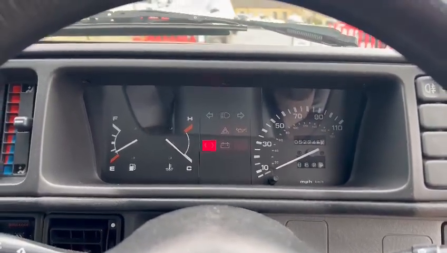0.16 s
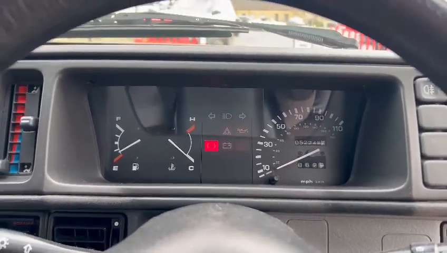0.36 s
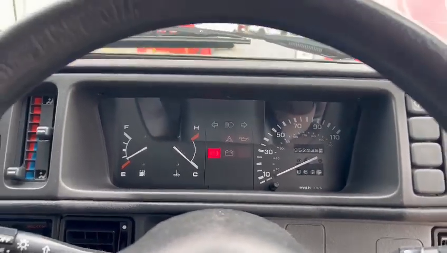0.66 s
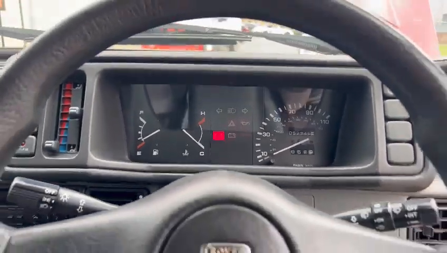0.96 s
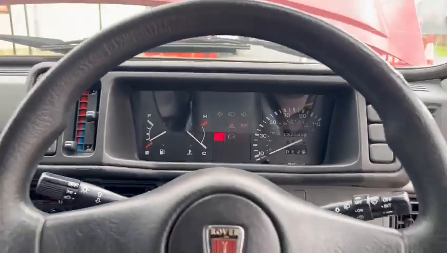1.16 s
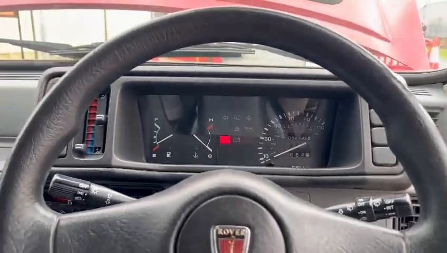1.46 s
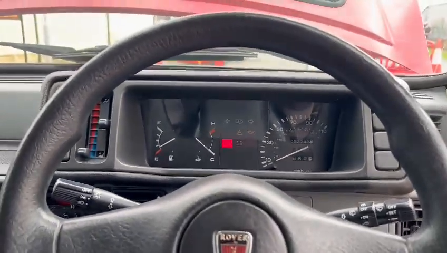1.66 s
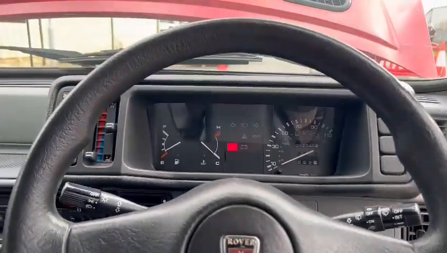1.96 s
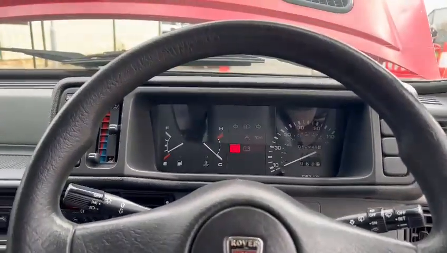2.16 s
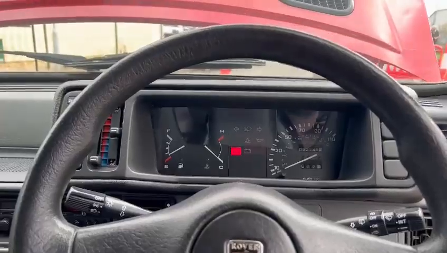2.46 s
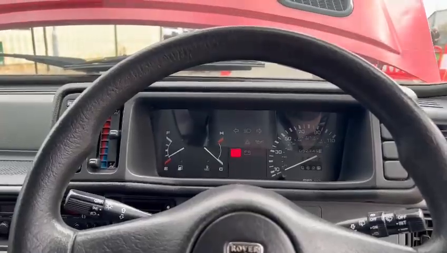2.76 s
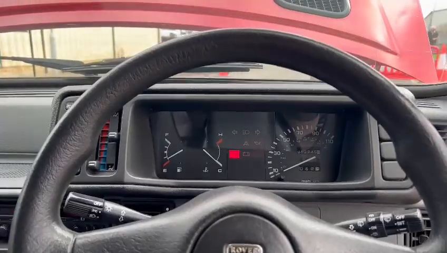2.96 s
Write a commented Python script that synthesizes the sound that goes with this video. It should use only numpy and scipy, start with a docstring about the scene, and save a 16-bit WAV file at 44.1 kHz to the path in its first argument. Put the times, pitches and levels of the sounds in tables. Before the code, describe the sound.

Small petrol engine idling inside a car, then two throttle blips, booming and snarling higher.

```python
"""A small four-cylinder petrol engine, heard from the driver's seat with the bonnet up, idles and is blipped twice.
Sinusoids locked to the firings make the cabin boom and bark; under load, upper orders add a climbing snarl.
Noise and impacts timed by the firings, coloured by filters, make the growl, rasp, clatter and hiss.
A whine follows the speed over a noise rumble; at idle something loose buzzes, then a faint steady whistle takes over."""
import sys
import numpy as np
from scipy import signal
from scipy.fft import rfft, irfft, next_fast_len
from scipy.io import wavfile
from scipy.ndimage import map_coordinates

SR = 44100
rng = np.random.default_rng(int(sys.argv[2]) if len(sys.argv) > 2 else 0)


def dump(signal):
    """Clip the signal to [-1, 1] and save it as 16-bit WAV at the path in sys.argv[1]."""
    limited = np.clip(np.atleast_2d(signal).T, -1, 1)
    pcm = np.round(limited * 32767).astype(np.int16)
    wavfile.write(sys.argv[1], SR, pcm)


N = 136710  # length in samples
HALVES = np.array([[0.5], [-0.5]])  # shares a left-right difference between the channels


def amp(db):
    """Logarithmic level: decibels become an amplitude gain."""
    return 10 ** (np.asarray(db) / 20)


def unit(x):
    """Power normalisation: scale to an rms of 1."""
    return x / np.sqrt(np.mean(x ** 2) + 1e-20)


def along(points, hz):
    """Logarithmic frequency scale: interpolate (Hz, value) points on it."""
    f, value = np.transpose(points)
    return np.interp(np.log(hz + 1), np.log(f + 1), value)


def curve(rows):
    """Envelope: (second, value) rows become one value per sample."""
    return np.interp(np.arange(N) / SR, *np.transpose(rows))


def wobble(rate):
    """Slow random modulation: a smooth curve through random knots, rate of them per second."""
    knots = rng.standard_normal(int(N * rate / SR) + 4)
    return map_coordinates(knots, [np.arange(N) * rate / SR])


def filtered(x, response):
    """Linear filtering: multiply the spectrum by a response of frequency."""
    m = next_fast_len(N + SR // 2)
    return irfft(rfft(x, m) * response(np.fft.rfftfreq(m, 1 / SR)), m)[..., :N]


def colour(points):
    """Frequency response: a gain curve through (Hz, dB) points."""
    return lambda hz: amp(along(points, hz))


# Level of the side signal against the mid. Each row: frequency in Hz, level in dB.
SIDE_LEVEL = [(60, -12.5), (130, -8), (250, -8.5), (500, 2), (1000, -0.5), (2000, 3.5), (4000, 0.5),
              (9000, -1)]
# Left-right level difference. Each row: frequency in Hz, left minus right in dB.
LEFT_RIGHT = [(60, 4.5), (250, -1), (500, 1.5), (1000, -4.5), (2000, -3), (4000, 2.5), (9000, 0)]
CABIN_T60_S = 0.044  # 60 dB decay of the noise that shapes the reflections


def cabin(x, response, t60_s=CABIN_T60_S):
    """Diffuse reflection: decaying noise scatters a coloured source into stereo whose mid has rms 1."""
    t = np.arange(SR // 10) / SR
    walls = rfft(rng.standard_normal((2, len(t))) * amp(-60 * t / t60_s))
    walls = irfft(walls / np.sqrt(np.abs(walls) + 1e-9))  # flattens the spectrum in part
    scattered = signal.fftconvolve(x[None], walls, axes=1)[:, :N]
    mid, side = filtered(scattered, response)
    mid = unit(mid)
    side = filtered(unit(side), colour(SIDE_LEVEL))
    pair = np.array([mid + side, mid - side])
    pair = filtered(pair, lambda hz: amp(along(LEFT_RIGHT, hz) * HALVES))
    return pair / np.sqrt(np.mean(pair.mean(0) ** 2))


def puffs(firings, depth):
    """Amplitude modulation: noise swells once per firing."""
    return unit(rng.standard_normal(N) * np.exp(depth * np.cos(2 * np.pi * firings)))


def impulses(at, size, firings):
    """Impulse train: summed impacts, scaled so that their density does not set their power."""
    train = np.bincount(at.astype(int).ravel(), size.ravel(), N)
    return unit(train / np.sqrt(np.gradient(firings)))


def jittered(at, jitter_s):
    """Timing jitter: shift each impact at random, within the sound."""
    return np.clip(at + SR * jitter_s * rng.standard_normal(at.shape), 0, N - 1)


def knocks(firings, scatter_db, jitter_s, cylinder_db, count):
    """Cyclic impacts: count per firing at set crank angles, with a strength for each of four cylinders."""
    firing = np.arange(int(firings[-1]))
    cylinders = rng.standard_normal((4, count))
    angle = (np.arange(count) + rng.random(count)) / count
    at = jittered(np.interp(firing[:, None] + angle, firings, np.arange(N)), jitter_s)
    uneven_db = cylinder_db * cylinders[firing % len(cylinders)]
    size = amp(uneven_db + scatter_db * rng.standard_normal(at.shape))
    return impulses(at, size, firings)


# Colour of the body shell. Each row: frequency in Hz, gain in dB.
RUMBLE_COLOUR = [(5, -60.5), (18, 7.5), (32, 8.5), (45, 8), (65, 20.5), (110, 8), (170, 4.5), (300, -32),
                 (900, -100)]
RUMBLE_IDLE_DB, RUMBLE_HIGH_DB = -42, -29.5  # at pace 0 and 1


def rumble(pace):
    """Random structural vibration: the body shell shakes more with speed."""
    level_db = RUMBLE_IDLE_DB + (RUMBLE_HIGH_DB - RUMBLE_IDLE_DB) * pace
    return amp(level_db) * cabin(rng.standard_normal(N), colour(RUMBLE_COLOUR))


# Level of the air hiss before HISS_DB. Each row: time in seconds, level in dB.
HISS_LEVEL = [(0.05, -62), (1.34, -61.5), (1.69, -52.5), (2.22, -60), (2.3, -53.5), (2.42, -52.5),
              (2.49, -46.5), (2.57, -45.5), (3.07, -56)]
# Colour of the hiss. Each row: frequency in Hz, gain in dB.
HISS_COLOUR = [(1000, -44.5), (2800, -8.5), (3500, -2.5), (4000, 1), (5000, 1), (5600, -1), (6300, 4.5),
               (7300, -4), (8600, -1), (9400, -4.5), (10000, -31.5), (11900, -10)]
HISS_DB = -1


def hiss(firings):
    """Turbulent flow noise: air rushes, with light tappet ticks in it."""
    ticks = knocks(firings, scatter_db=-1, jitter_s=0.0002, cylinder_db=2.5, count=3)
    air = puffs(firings, depth=0.041) + amp(-10.5) * ticks
    level_db = curve(HISS_LEVEL) + HISS_DB + 0.89 * wobble(25.6)
    return amp(level_db) * cabin(air, colour(HISS_COLOUR))


# Resonances that the whine passes. Each row: pitch of the whine in Hz, level in dB.
WHINE_RESONANCES = [(330, -75), (540, -55.5), (590, -46.5), (622, -42.5), (660, -56.5), (705, -67),
                    (750, -37.5), (805, -42), (860, -38.5), (885, -43)]
WHINE_ORDER = 7  # cycles per firing


def whine(firings, rate):
    """Order tracking: a driven accessory's rough tone follows the crank through the body's resonances."""
    angle = 2 * np.pi * WHINE_ORDER * firings + 0.16 * wobble(80)
    level_db = along(WHINE_RESONANCES, WHINE_ORDER * rate) + 1.8 * wobble(90)
    tone = np.sin(angle) + amp(-15.5) * np.sin(2 * angle)
    return np.sqrt(2) * amp(level_db) * tone * amp([[-1.5], [1.5]])


# Level of the whistle. Each row: time in seconds, level in dB.
WHISTLE_LEVEL = [(.85, -73), (.98, -62), (1.3, -57), (1.37, -63), (1.45, -67), (1.7, -81)]
WHISTLE_HZ, WHISTLE_WAVER_HZ = 1828, 2.4  # mean pitch, size of its random waver


def whistle():
    """Frequency modulation: a faint sinusoid wavers slightly about a pitch independent of the engine speed."""
    hz = WHISTLE_HZ + WHISTLE_WAVER_HZ * wobble(73)
    tone = np.sin(2 * np.pi * np.cumsum(hz) / SR)
    return np.sqrt(2) * amp(curve(WHISTLE_LEVEL) + wobble(40)) * tone * amp([[-2.5], [2.5]])


# Level of the buzz. Each row: time in seconds, level in dB.
BUZZ_LEVEL = [(0, -51.5), (.88, -52.5), (1.03, -64), (1.45, -74)]
# The strikes of one firing. Each row: share of the firing period, strength in dB.
BUZZ_STRIKES = [(0, 0), (1 / 3, 0.5), (2 / 3, -3.5)]
# The two bands in which the loose part rings. Each row: frequency in Hz, gain in dB.
BUZZ_COLOUR = [(400, -32), (540, -0.5), (612, 11.5), (720, -3), (850, -21), (1060, -20.5), (1180, -3),
               (1300, -5), (1440, -1.5), (1560, -21), (2200, -46)]
BUZZ_T60_S = 0.011


def buzz(firings):
    """Repeated impact: each firing at idle throws a loose part, which strikes three times."""
    angle, strike_db = np.transpose(BUZZ_STRIKES)
    firing = np.arange(int(firings[-1]) - 1)
    at = jittered(np.interp(firing[:, None] + angle, firings, np.arange(N)), 0.0004)
    size = amp(strike_db + 2 * rng.standard_normal(at.shape))
    strikes = impulses(at, size, firings)
    return amp(curve(BUZZ_LEVEL)) * cabin(strikes, colour(BUZZ_COLOUR), BUZZ_T60_S)


# Level of the valve and piston clatter before the trims below. Each row: time in seconds, level in dB.
CLATTER_LEVEL = [(0.05, -52.5), (0.76, -53.5), (1.34, -49), (1.77, -38.5), (1.87, -45.5), (2.15, -48),
                 (2.46, -36), (2.55, -31), (2.58, -33.5), (2.79, -35.5), (2.88, -37), (3.04, -43.5),
                 (3.07, -41.5)]
# Colour of the block at low speed. Each row: frequency in Hz, gain in dB.
CLATTER_IDLE_COLOUR = [(60, -59), (200, -8.5), (280, 2), (400, -4.5), (520, -1), (640, 1.5), (800, -8),
                       (980, -9), (1150, -4.5), (1400, -8.5), (1550, -12.5), (1950, -7), (2400, -16.5),
                       (3300, -19), (9000, -80)]
# Colour of the block at high speed. Each row: frequency in Hz, gain in dB.
CLATTER_HIGH_COLOUR = [(100, -73), (300, -22.5), (500, -10.5), (620, 0.5), (700, -10.5), (770, 0.5),
                       (860, -2), (960, 1), (1150, -3), (1370, -1.5), (1530, -6.5), (2050, -5), (2400, -21),
                       (2600, -6.5), (2750, -37), (2900, -11), (3300, -33), (9000, -94)]
CLATTER_IDLE_DB, CLATTER_HIGH_DB = -1.5, -1


def clatter(firings, pace):
    """Impact excitation: valves and pistons knock in the block; a crossfade hardens the colour with speed."""
    hits = knocks(firings, scatter_db=2.5, jitter_s=0.00012, cylinder_db=2, count=6)
    hits += amp(2) * puffs(firings, depth=0.3)
    fade = np.pi / 2 * np.clip(1.47 * pace, 0, 1)  # equal-power crossfade angle
    slow = amp(CLATTER_IDLE_DB) * np.cos(fade) * cabin(hits, colour(CLATTER_IDLE_COLOUR))
    fast = amp(CLATTER_HIGH_DB) * np.sin(fade) * cabin(hits, colour(CLATTER_HIGH_COLOUR))
    return amp(curve(CLATTER_LEVEL)) * (slow + fast)


RING_TOP_HZ = 2980  # the ringing parts radiate little above this


def resonances(modes):
    """Modal superposition: the response of damped modes of alternating sign, rolled off at the top."""
    def response(hz):
        ring = 0
        for k, (centre, width, db) in enumerate(modes):
            damping = 1j * hz * width
            ring = ring + (-1) ** k * amp(db) * damping / (centre ** 2 - hz ** 2 + damping)
        return ring / (1 + (hz / RING_TOP_HZ) ** 2) ** 2
    return response


# Level of the rasp as the throttle is held wide open. Each row: time in seconds, level in dB.
RASP_LEVEL = [(1.45, -54), (1.66, -47), (1.8, -66), (2.3, -52), (2.48, -53), (2.545, -27.5), (2.59, -40),
              (2.8, -46)]
# Modes of the air box. Each row: centre in Hz, width in Hz, gain in dB.
AIR_BOX_MODES = [(447, 30, -4), (850, 99, -7.5), (1347, 135, 2.5), (1697, 78, -9)]


def rasp(firings):
    """Resonance under impulsive load: each firing rings the air box."""
    blows = knocks(firings, scatter_db=1.5, jitter_s=0.0001, cylinder_db=2, count=1)
    blows += amp(-2) * puffs(firings, depth=0.8)
    return amp(curve(RASP_LEVEL)) * cabin(blows, resonances(AIR_BOX_MODES))


# Level of the intake growl before GROWL_DB. Each row: time in seconds, level in dB.
GROWL_LEVEL = [(0, -50), (1.39, -47), (1.5, -39), (1.63, -34.5), (1.7, -29.5), (1.78, -36.5), (1.88, -38),
               (2.19, -43), (2.3, -33.5), (2.38, -36.5), (2.49, -27), (2.56, -28), (2.64, -35.5),
               (2.9, -33), (3.1, -39)]
# Colour of the intake. Each row: frequency in Hz, gain in dB.
GROWL_COLOUR = [(50, -72.5), (120, -23.5), (170, 2), (210, 3), (280, 2.5), (340, -6.5), (400, -4),
                (445, -8), (500, -4.5), (600, -11.5), (900, -45), (2000, -120)]
GROWL_DB = -1.5


def intake(firings):
    """Pulsed air flow: one gulp per firing rings the intake as a growl."""
    gulps = knocks(firings, scatter_db=2.5, jitter_s=0.00018, cylinder_db=-0.5, count=1)
    gulps += amp(3.0) * puffs(firings, depth=0.39)
    return amp(curve(GROWL_LEVEL) + GROWL_DB) * cabin(gulps, colour(GROWL_COLOUR))


# Level of the upper firing orders, strong while the throttle is open. Each row: time in seconds, level in dB.
SNARL_LEVEL = [(1.42, -65), (1.52, -45), (1.59, -39), (1.7, -38.5), (1.77, -55), (2.2, -59), (2.29, -35.5),
               (2.4, -43), (2.5, -30), (2.55, -31), (2.6, -60)]
# Fixed resonances that the orders sweep through. Each row: frequency in Hz, gain in dB.
SNARL_RESONANCES = [(200, -17), (285, -12), (340, -20), (400, -10), (442, 2), (480, -16), (600, -22),
                    (700, -30), (800, -21), (1050, -23), (1220, -19), (1320, -4), (1420, -13), (1600, -26)]


def snarl(firings, rate):
    """Harmonics swept through resonance: rough upper orders under load swell as they cross each peak."""
    lines = 0
    for k in range(4, 16):  # multiples of the firing rate
        level_db = along(SNARL_RESONANCES, k * rate) + 2.5 * wobble(70)
        cycles = k * firings + rng.random() + 0.075 * wobble(90)
        lines = lines + amp(level_db) * np.cos(2 * np.pi * cycles)
    return np.sqrt(2) * amp(curve(SNARL_LEVEL)) * lines


# Level of the boom close to the firing rate. Each row: time in seconds, level in dB.
BOOM_LEVEL = [(0, -56), (1.43, -35.5), (1.5, -51), (1.55, -16), (1.63, -12.5), (1.67, -15), (1.705, -19.5),
              (1.735, -9), (1.765, -26.5), (1.805, -14.5), (1.835, -25.5), (1.87, -16.5), (1.96, -16),
              (2.06, -15), (2.12, -27.5), (2.16, -13), (2.24, -26), (2.29, -15), (2.37, -12.5),
              (2.4, -10.5), (2.545, -11), (2.565, -28), (2.59, -32), (2.605, -14), (2.79, -12), (2.86, -15),
              (2.95, -13), (3.02, -20.5), (3.1, -20.5)]
# Level of the bark, led by twice the firing rate. Each row: time in seconds, level in dB.
BARK_LEVEL = [(0, -25.5), (1.42, -26), (1.5, -20), (1.55, -13), (1.64, -16.5), (1.68, -40), (2.07, -40),
              (2.11, -26), (2.2, -38), (2.25, -22), (2.3, -20), (2.34, -30.5), (2.48, -28.5), (2.55, -35),
              (2.62, -53), (3.1, -46)]
# Partials of the bark. Each row: multiple of the firing rate, level in dB.
BARK_PARTIALS = [(2, -1), (3, -10), (4, -27.5)]
# Lines that uneven cylinders add between the firing orders.
# Each row: multiple of the firing rate, level in dB at pace 0, level in dB at pace 1.
UNEVEN_ORDERS = [(.5, -60, -35), (.75, -46, -58), (1.25, -57, -58), (1.5, -41, -42), (1.75, -53, -58),
                 (2.5, -60, -48), (3.25, -55, -54), (3.5, -57, -54)]
BOOM_PAN_DB, BOOM_LAG_S = 1.5, 0.00051  # how much louder and later the left channel is


def exhaust(firings, pace):
    """Fourier synthesis: clean low orders make the boom, the bark and the lope of uneven cylinders."""
    def order(k):
        return np.sqrt(2) * np.cos(2 * np.pi * k * firings)

    low = amp(curve(BOOM_LEVEL) + 1.4 * wobble(45)) * order(0.99)
    bark = sum(amp(db) * order(round(k)) for k, db in BARK_PARTIALS)
    low += amp(curve(BARK_LEVEL) + 0.8 * wobble(40)) * bark
    for k, idle_db, high_db in UNEVEN_ORDERS:
        quarter = round(k * 4) / 4  # four cylinders repeat every four firings
        level_db = idle_db + (high_db - idle_db) * pace + 1.5 * wobble(15)
        low += amp(level_db) * order(quarter)

    def stereo(hz):
        return amp(BOOM_PAN_DB * HALVES) * np.exp(-2j * np.pi * hz * BOOM_LAG_S * HALVES)

    return filtered(low, stereo)


# Engine speed through the idle and the two blips. Each row: time in seconds, firings per second.
ENGINE_SPEED = [(0, 43.7), (1.41, 43.4), (1.48, 51), (1.552, 57), (1.618, 65.3), (1.69, 84.5), (1.75, 90.7),
                (1.85, 81.7), (1.96, 70), (2.08, 70.4), (2.19, 56), (2.23, 61.2), (2.302, 71.8),
                (2.408, 94.9), (2.496, 111.3), (2.565, 124), (2.63, 122.2), (2.798, 108.7), (2.9, 100),
                (3.1, 80)]
IDLE_HZ, HIGH_HZ = 39.4, 112  # firing rates at which the pace is 0 and 1


def scene():
    """Common excitation: the crankshaft times every source but the rumble's noise and the whistle."""
    rate = curve(ENGINE_SPEED)
    firings = np.cumsum(rate) / SR  # firings elapsed, the phase of the engine
    pace = np.log(rate / IDLE_HZ) / np.log(HIGH_HZ / IDLE_HZ)
    background = rumble(pace) + hiss(firings) + whine(firings, rate) + whistle()
    mechanical = buzz(firings) + clatter(firings, pace)
    gas_flow = rasp(firings) + intake(firings) + snarl(firings, rate) + exhaust(firings, pace)
    return background + mechanical + gas_flow


TOP_HZ = 11900


def record(dry):
    """Band limiting: an ideal low-pass filter keeps nothing from TOP_HZ up."""
    return filtered(dry, lambda hz: hz < TOP_HZ)


dry = scene()
out = record(dry)
dump(out)
```